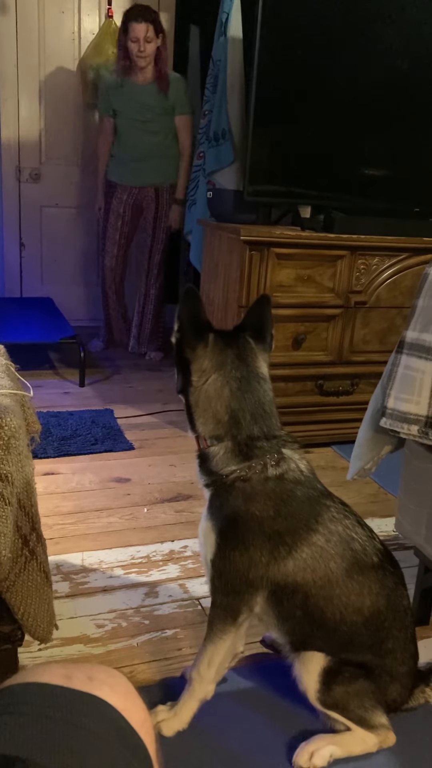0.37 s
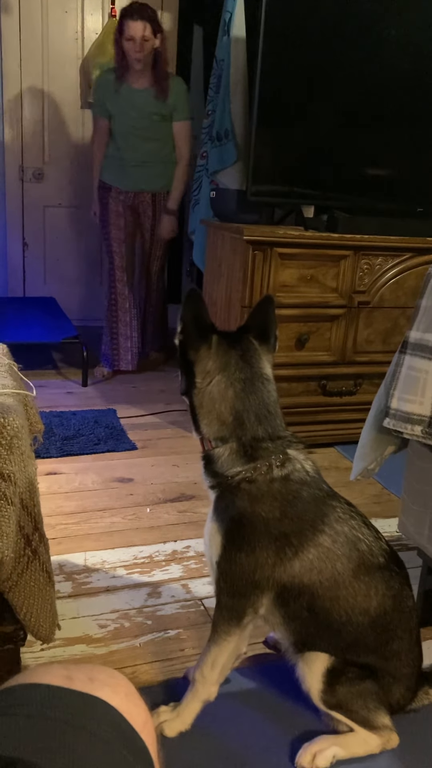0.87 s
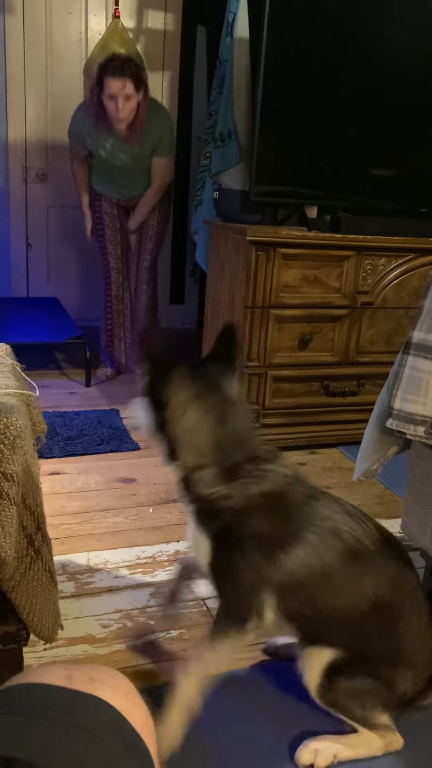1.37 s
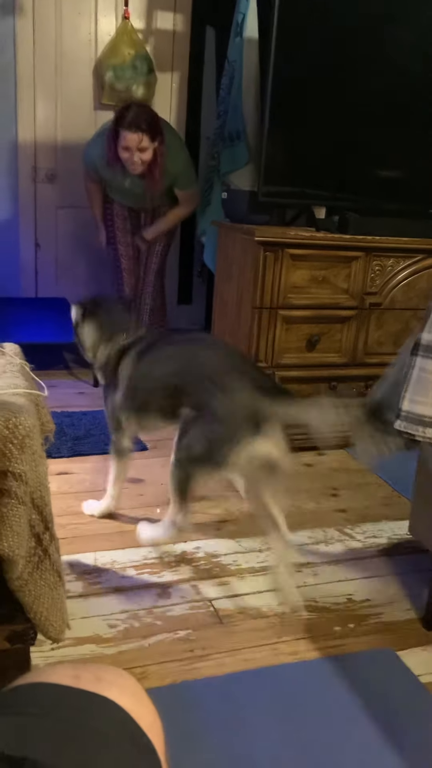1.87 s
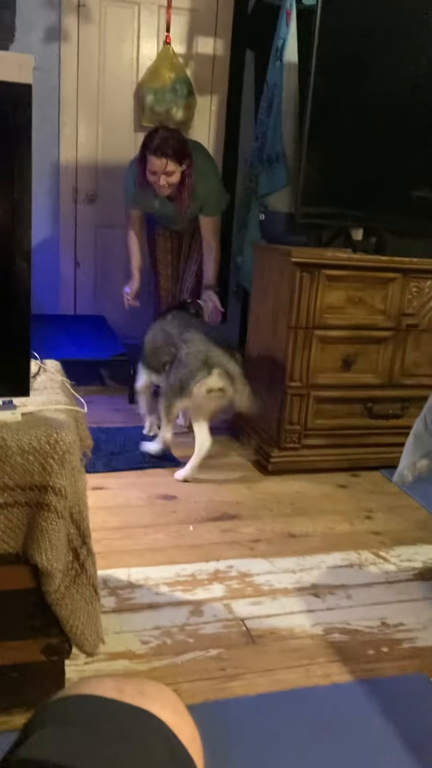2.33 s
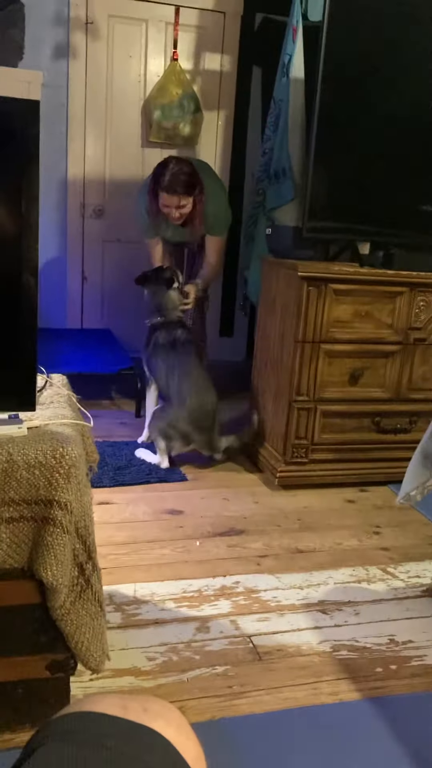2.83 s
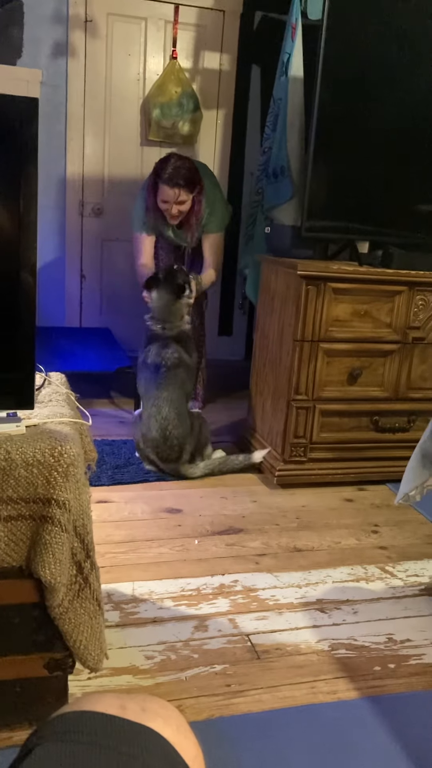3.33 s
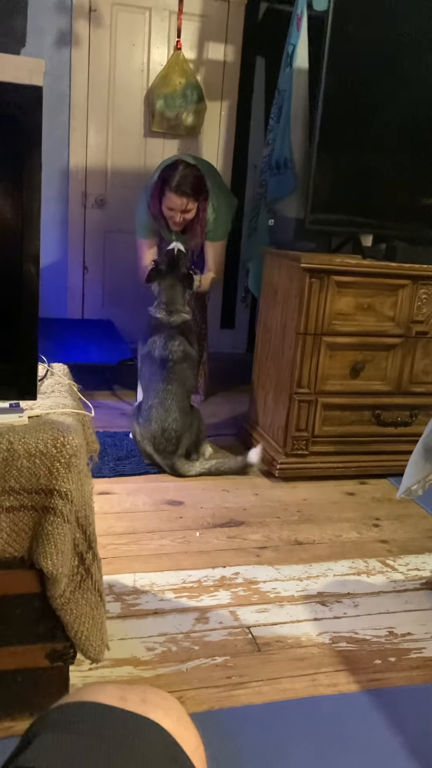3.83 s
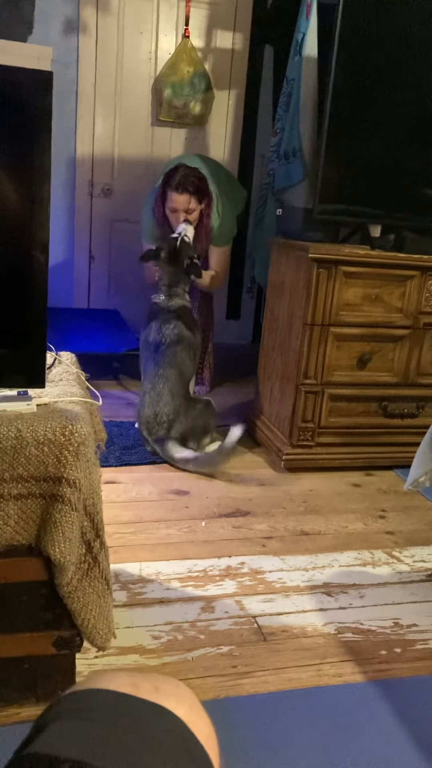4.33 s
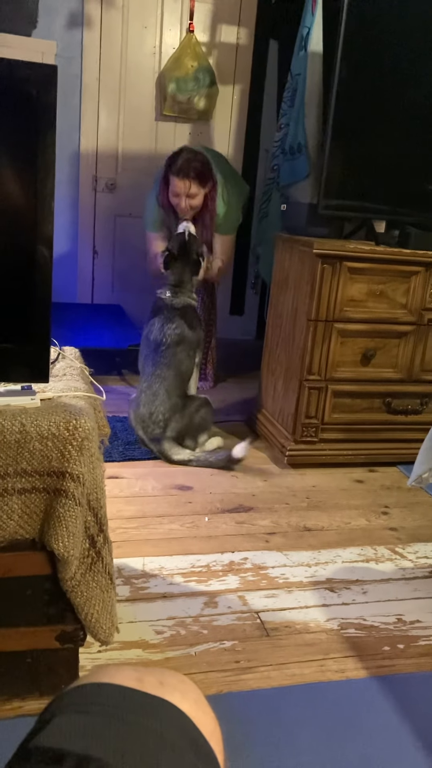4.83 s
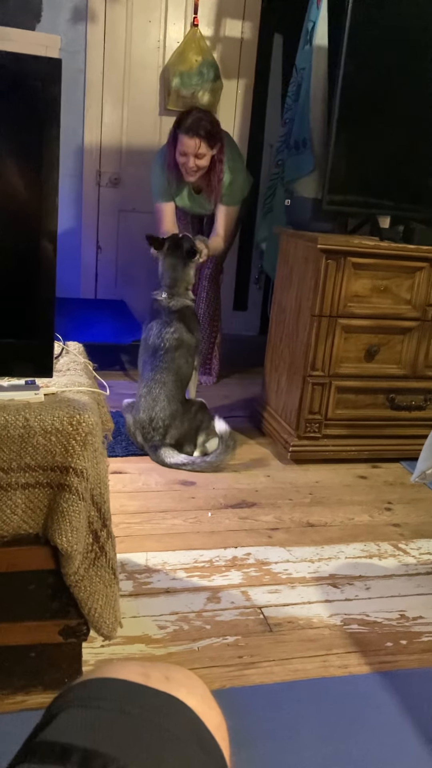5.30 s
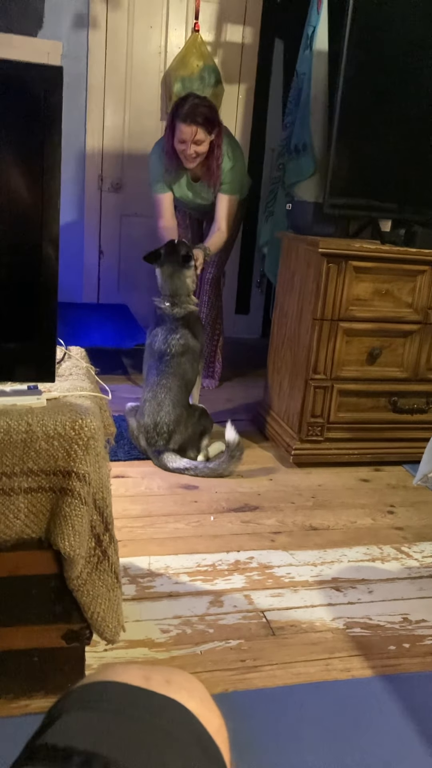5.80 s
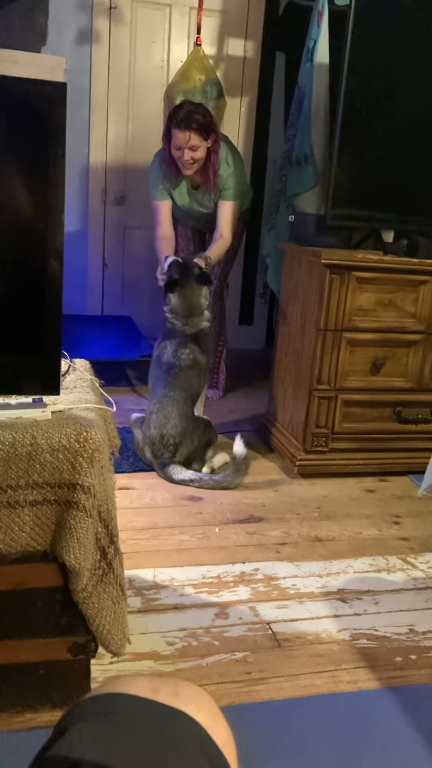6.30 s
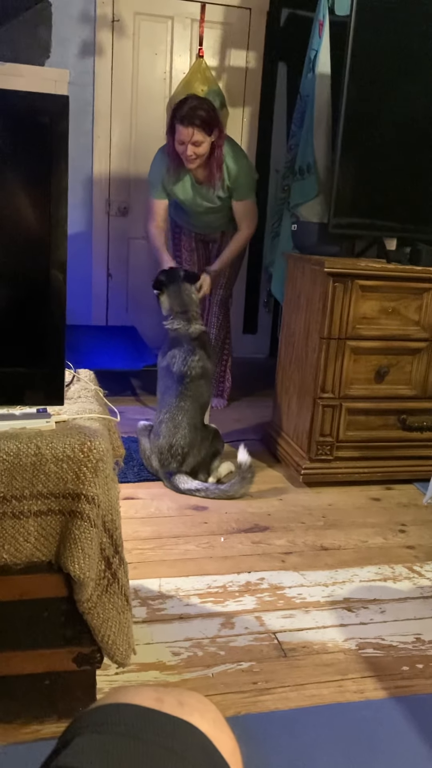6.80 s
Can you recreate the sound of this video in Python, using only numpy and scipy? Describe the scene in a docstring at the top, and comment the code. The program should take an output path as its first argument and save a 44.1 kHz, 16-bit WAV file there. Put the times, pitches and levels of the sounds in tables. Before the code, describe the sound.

One long mid-pitched husky howl slides downward, clear at first, then trembling and coarse, ending in a rasp with a quick pitch drop. Quick faint claw ticks and muffled paw landings overlap and follow its end, then scattered small knocks and a brief scuff on bare boards. Underneath, a quiet fan-like blower hums and rushes, gradually louder. Heard by a nearby two-port phone microphone in a furnished room with a short echo.

```python
"""From the start a blower, filtered noise and a wavering hum, grows louder under a husky's falling howl.
The young dog is near two microphone ports in a small wooden room; modulated folds drive its throat.
The note starts clean, flutters from 0.3 s, locks to three cycles at 1.1 s, rasps, growls, rasps and drops.
From 1 s paws scuff (shaped noise); from 1.5 s claws tick (snaps, board modes), and soft pads thud (low
sine pulses). The last claw falls at 5.4 s, and the blower is left alone."""
import sys
import numpy as np
from scipy import signal
from scipy.fft import rfft, irfft
from scipy.io import wavfile
from scipy.ndimage import uniform_filter1d

SR = 44100
rng = np.random.default_rng(int(sys.argv[2]) if len(sys.argv) > 2 else 0)


def wav_out(sig):
    """Save sig, one row per channel (or a flat mono array), as 16-bit PCM at SR to the path in sys.argv[1]."""
    wavfile.write(sys.argv[1], SR, np.round(np.clip(np.atleast_2d(sig).T, -1, 1) * 32767).astype(np.int16))


def ratio_of_db(decibels):
    """Turn decibels (scalar or array-like) into linear amplitude factors; 0 dB maps to 1."""
    return 10 ** (np.asarray(decibels, float) / 20)


N = 305018
T = np.arange(N) / SR  # time [s]
HZ = np.fft.rfftfreq(N, 1 / SR) + 1e-3  # frequency [Hz], kept off zero

# falling note that drives the throat: (time [s], pitch [Hz], relative level [dB])
HOWL_NOTE = [(0.0, 523.5, -23.5), (0.126, 493.4, -25), (0.29, 491.1, -25), (0.328, 452.8, -23.5),
             (0.8, 441.9, -26.5), (1.058, 433, -28), (1.068, 428.6, -32.5), (1.11, 433.5, -27),
             (1.12, 421.3, -22.5), (1.36, 399.4, -24.5), (1.5, 387.7, -26), (1.6, 398.4, -24.5),
             (1.772, 366.9, -25.5), (1.82, 391.7, -30), (1.85, 310, -32), (1.88, 220, -31),
             (1.915, 200, -46)]
# the note passes from register to register:
# (start [s], register [name], roughness at its start [0-1], roughness at its end [0-1])
REGISTER_SECTIONS = [(0, "clean", 0, .02), (.305, "flutter", 0.5, 0.86), (1.11, "locked", .18, 0.12),
                     (1.36, "rasp", 0.5, 0.52), (1.57, "growl", .33, 0.69), (1.795, "rasp", 0.5, 0.53)]
# how the folds swing in each register, by name: upper, lower, second = shares of the partner tones one
# flutter above, one below and two above the note [ratio]; slap_db, overtones_db = relative levels [dB]
FOLD_REGISTERS = { "clean": dict(upper=0.055, lower=.01, second=.01, slap_db=-60.5, overtones_db=9.5),
                  "flutter": dict(upper=0.77, lower=.03, second=0.019, slap_db=-41.5, overtones_db=4.5),
                  "locked": dict(upper=0.26, lower=0.29, second=0.23, slap_db=-19, overtones_db=-13.5),
                  "growl": dict(upper=0.26, lower=0.19, second=0.19, slap_db=-24, overtones_db=-4.5),
                  "rasp": dict(upper=-.08, lower=0.2, second=0.049, slap_db=-18, overtones_db=3.5), }
# throat and mouth resonances: (frequency [Hz], width of one stage [Hz], gain [dB])
THROAT_RESONANCES = [(486, 318, 2), (667, 140, -4), (751, 54.5, 5), (1049, 120, -5.5), (1449, 120, 4.5),
                     (2820, 1100, -38), (5770, 560, -10), (8240, 500, -6.5), (9400, 1500, -8.5)]
# muzzle movement: (time [s], closing [0-1])
MUZZLE_CLOSING = [(.45, 0), (1.1, 0.7), (1.12, 0), (1.35, .35), (1.39, .95)]
# claw blows on boards: (time [s], relative level [dB], sharp tick [0-1], top part [dB])
CLAW_BLOWS = [(1.508, -53.5, 0.7, -21), (1.528, -42.5, 0.6, -30.5), (1.576, -47, 0.95, -19.5),
              (1.5955, -36, 0.9, -33.5), (1.648, -48.5, 0.9, -25.5), (1.8525, -33, 0.7, -20.5),
              (1.929, -51.5, 0.95, -19.5), (1.9725, -46.5, 0.05, -29), (2.138, -50, 0.4, -23),
              (2.3084, -56, 0.45, -18), (2.6535, -42.5, 0.57, -33.5), (3.2245, -30.5, 0.14, -34),
              (3.37, -53.5, 0.05, -33), (3.5414, -38.5, 0.22, -27), (3.7314, -48, 0, -39),
              (3.808, -54, 0.3, -35), (3.8658, -52.5, 0.45, -21.5), (4.0685, -60, 1, -34),
              (4.17, -50, 0.2, -46), (4.368, -55.5, 0.3, -32), (4.559, -29.5, 0.4, -31),
              (4.9194, -51.5, 0.3, -35), (5.447, -38.5, 0.36, -27)]
# floorboard modes: (frequency [Hz], relative level under a blunt blow [dB])
BOARD_MODES = [(1810, -7.5), (4540, -14)]
# paw and fur scuffs: (start [s], swell [s], first level [dB], peak level [dB], top part at start [dB])
SCUFF_EVENTS = [(1.02, 0.068, -52.5, -53.5, 0), (1.286, 0.13, -67.5, -53.5, 2.5),
                (1.601, 0.033, -69, -61, -16), (1.738, 0.0063, -68, -67, -13.5),
                (4.486, 0.058, -54.5, -40.5, -7.5)]
# colour that boards and microphone give a scrape: (frequency [Hz], level [dB])
SCRAPE_COLOUR = [(530, -34.5), (900, -3.5), (1370, 7.5), (1510, 7), (1870, 2), (2080, 4.5), (3050, -2.5),
                 (4220, -0.5), (5900, -18), (7860, -7.5), (11400, -18), (11800, -47), (12800, -15),
                 (14500, -14.5), (15700, -19)]
# paw landings: (time [s], relative level [dB], tone [Hz])
PAW_LANDINGS = [(1.945, -35, 71), (1.973, -30.5, 262), (2.039, -36, 256), (2.321, -31, 135),
                (4.924, -32.5, 298)]
# blower rush: (time [s], mean level [dB])
BLOWER_LEVEL = [(0.0, -61.5), (0.3, -56.5), (2.1, -56), (4.3, -54.5), (5.35, -50), (6.92, -49)]
# colour of the air rush: (frequency [Hz], relative level [dB])
RUSH_COLOUR = [(18, -43), (30, -14), (49, -3), (70, -4), (91, -9), (226, -4), (263, -7), (294, -5),
               (448, -21.5), (524, -14), (612, -16), (1360, -25), (2420, -29.5), (2890, -30), (6000, -39.5),
               (7800, -72), (13200, -120)]
# duct resonances: (frequency [Hz], width [Hz], gain [dB])
DUCT_RESONANCES = [(303, 91, 6.5), (450, 150, 7), (1074, 60, 2), (1292, 97, 8.5), (1976, 48, 8),
                   (2793, 17, 12.5)]
# colour of the thin hiss: (frequency [Hz], relative level [dB])
HISS_COLOUR = [(2350, -36), (4000, -19), (5480, -19), (6740, -6), (8820, -5.5), (10400, -14.5),
               (10800, -46), (12200, -30.5), (14600, -18), (15700, -29.5)]
# port differences for room sound, then for the dog:
# (frequency [Hz], left minus right [dB], left lead beyond the lag [rad], likeness [0-1])
ROOM_PORTS = [(60, 1.6, 0, .99), (200, 1, -.2, .99), (310, 3.8, -.5, .93), (400, 0, -.6, .87),
              (500, 5, -1.8, .55), (650, -3, -2, .6), (1250, -3.4, -.4, .55), (2000, -.8, 0, .65),
              (3000, -1, 1.3, .6), (3900, -1, -1, .4), (6000, 1, -.3, .7), (7700, 0, .2, .94),
              (9600, 0, 1, .9), (15000, 0, 1.6, .95)]
DOG_PORTS = [(200, 2, -.1, 1), (300, 4.5, .1, 1), (400, 9.5, .7, 1), (450, 12, .6, 1), (500, 12, .1, 1),
             (600, 12, .4, 1), (770, 13, -.4, 1), (1000, 15, -1.6, 1), (1200, 7, -1.2, 1),
             (1400, 6, -1.5, 1), (1520, 4, -1, 1), (2000, -1, -.6, 1), (5500, -9, -.1, 1),
             (9600, -.5, .7, 1)]

PORT_LAG_S = .000113  # the right port hears this much later, before the table's phase
OVERTONE_DB, OVERTONE_SLOPE_DB = -17.5, -11  # second harmonic [dB], fall [dB per octave]
CLOSED_SCALE = 0.9506  # resonance frequencies with the muzzle closed, as a ratio
SWITCH_S = 0.0027  # glide from register to register
PARTNER_HZ = 507  # outside rasp and lock a second swing stays near this pitch while the note sinks
RASP_HZ = 53.2  # mean flutter rate in the rasp
SCUFF_FADE_DB_PER_S, SCUFF_LINGER_DB, SCUFF_LINGER_DB_PER_S = 331, -32, 56.5
# over a scuff's swell the low part grows and the top part thins
LOW_FIRST_DB, LOW_PEAK_DB, LOW_LATE_DB, TOP_LOSS_DB = -16.5, -6, -1, -4.5
CLAW_TAIL_T60_S = .19  # of a blunt blow; sharp ticks decay sooner
SNAP_DB = 3  # snap over the blow, for a fully sharp tick
SHARP_RING_DB = -12  # board ring under a fully sharp tick, against a blunt blow
HUM_DB, HUM_HZ = 3, 58.2  # mean level over the rush, mean pitch
HISS_DB = -78
ROOM_T60_S, ROOM_DB = .25, -19  # decay time, tail energy against the direct sound


def curves(rows):
    """Linear interpolation turns each column of a time table into a signal."""
    s, *columns = np.transpose(rows)
    return [np.interp(T, s, column) for column in columns]


def along(rows, column=1):
    """Interpolation on a logarithmic frequency axis gives a spectral curve."""
    rows = np.array(rows)
    return np.interp(np.log(HZ), np.log(rows[:, 0]), rows[:, column])


def unit(x):
    """Normalisation by root mean square gives unit power."""
    return x / np.sqrt(np.mean(x ** 2))


def band_unit(x, lo_hz, hi_hz):
    """Band normalisation gives one band of the two ports' mean an rms of 1."""
    inside = (HZ > lo_hz) & (HZ < hi_hz)
    return x / np.std(irfft(rfft(x.mean(axis=0)) * inside, N))


def resonance(hz, width):
    """A damped second-order resonator passes a band, with gain 1 at its centre."""
    return 1j * HZ * width / (hz ** 2 - HZ ** 2 + 1j * HZ * width)


def walk(rate):
    """Twice-averaged white noise wanders smoothly, turning about rate times a second, with rms 1."""
    k = max(int(SR / rate), 1)
    return unit(uniform_filter1d(uniform_filter1d(rng.standard_normal(N), k), k))


def ports(direct, other, table):
    """Interaural-style level, phase and coherence: a sound and an unrelated twin form left and right."""
    half = ratio_of_db(along(table, column=1) / 2)
    lead = along(table, column=2) + 2 * np.pi * HZ * PORT_LAG_S
    like = np.clip(along(table, column=3), 0, 1)
    shared = np.sqrt((1 + like) / 2) * rfft(direct)
    opposed = np.sqrt((1 - like) / 2) * rfft(other)
    left = (shared + opposed) * half * np.exp(.5j * lead)
    right = (shared - opposed) / half * np.exp(-.5j * lead)
    # keeps the level of the middle roughly even; the small term avoids division by zero
    mid = np.sqrt(half ** 2 + half ** -2 + 2 * like * np.cos(lead) + 0.064) / 2
    return irfft(np.array([left, right]) / mid, N)


def noise_pair(rows):
    """A diffuse field: coloured noise reaches the two ports only partly alike."""
    a, b = irfft(rfft(rng.standard_normal((2, N))) * ratio_of_db(along(rows)), N)
    return ports(a, b, ROOM_PORTS)


def howl():
    """Source and filter: modulated vocal folds, slaps and breath excite the resonant throat."""
    pitch, level_db = curves(HOWL_NOTE)
    folds, rough, register = registers()
    upper, lower, second, slap_db, overtones_db = folds.values()
    flutter_hz = np.where(register == "rasp", RASP_HZ, PARTNER_HZ - pitch)
    swing = 2 * np.pi * np.cumsum(pitch * (1 + .025 * rough * walk(150))) / SR
    free = 2 * np.pi * np.cumsum(flutter_hz * (1 + 0.22 * rough * walk(60))) / SR
    # locked: one flutter lasts exactly three cycles
    flutter = np.where(np.isin(register, ("locked", "growl")), swing / 3, free)
    upper = upper * ratio_of_db(1.5 * rough * walk(40))  # the partner comes and goes
    # the partners beat with the note: its size and timing swing once a flutter
    beat = 1 + upper * np.exp(1j * flutter) + lower * np.exp(-1j * flutter)
    beat = beat + second * np.exp(2j * flutter)
    beat = beat / np.sqrt(1 + upper ** 2 + lower ** 2 + second ** 2)
    cycle = swing + np.angle(beat)
    size = 1.3 * np.tanh(np.abs(beat)) + .15 * rough * walk(250)  # the swing saturates
    scatter = (.035 + .5 * rough) * walk(300)  # the closing moment wanders, which blurs the overtones
    overtones = 0
    for k in range(2, 23):
        overtone_db = OVERTONE_DB + OVERTONE_SLOPE_DB * np.log2(k / 2)
        overtones = overtones + ratio_of_db(overtone_db) * np.cos(k * (cycle + scatter))
    # the folds slap shut sharply only on the cycles at the crest of the flutter
    slap = np.exp(14 * (np.cos(cycle) - 1)) * np.exp(6.4 * (np.cos(flutter) - 1))
    slap = slap * ratio_of_db(5 * rough * walk(150))
    turbulence = 1.27 * walk(700) + ratio_of_db(-27.5) * rng.standard_normal(N)
    breath = rough * turbulence * (1 + np.cos(cycle))
    # slap and breath fill the spectrum around the note and leave the note itself steady
    around_note = 1 - .92 * np.abs(resonance(420, 240))
    rasp = irfft(rfft(ratio_of_db(slap_db) * unit(slap) + breath) * around_note, N)
    flow = (np.cos(cycle) + ratio_of_db(overtones_db) * overtones) * size + rasp
    flow = flow * ratio_of_db(level_db) * np.clip((HOWL_NOTE[-1][0] - T) / 0.03, 0, 1)
    # a closing muzzle lowers all resonances: crossfade from the open to the closed throat
    opened, closed = (irfft(rfft(flow) * throat(scale), N) for scale in (1, CLOSED_SCALE))
    closing = np.clip(curves(MUZZLE_CLOSING)[0], 0, 1)
    return np.sqrt(2) * ((1 - closing) * opened + closing * closed)


def registers():
    """Register transition: fold settings and roughness glide at a switch, the register's name jumps."""
    starts = [row[0] for row in REGISTER_SECTIONS] + [HOWL_NOTE[-1][0]]
    now = np.clip(np.searchsorted(starts, T, side="right") - 1, 0, len(REGISTER_SECTIONS) - 1)
    done = np.clip((T - np.take(starts, now)) / np.diff(starts)[now], 0, 1)
    names = [row[1] for row in REGISTER_SECTIONS]

    def glide(values):
        """A moving average spreads a step over the switch time."""
        return uniform_filter1d(np.asarray(values, float), max(int(SWITCH_S * SR), 1))

    folds = {}
    for key in FOLD_REGISTERS["clean"]:
        settings = np.array([FOLD_REGISTERS[name][key] for name in names])
        folds[key] = glide(settings[now])
    first, last = np.array([row[2:] for row in REGISTER_SECTIONS])[now].T
    rough = np.clip(glide(first + (last - first) * done), 0, 1)
    return folds, rough, np.array(names)[now]


def throat(scale):
    """Formants: parallel squared resonators, all centre frequencies shifted by one factor."""
    return sum(ratio_of_db(db) * resonance(scale * hz, width) ** 2 for hz, width, db in THROAT_RESONANCES)


def claws():
    """Impact excitation: a snap, a tick, ringing board modes and a scattered tail; blunt blows rise slower."""
    low, high, top = scrape_noise()
    tone, snap, shape, top_shape = np.zeros((4, N))
    for s, db, tick, top_db in CLAW_BLOWS:
        t = np.maximum(T - s, 0)
        on = ratio_of_db(db) * (T >= s)
        sharp = tick * np.exp(-t / 0.003) * (1 - np.exp(-t / 0.00076))
        tail_t60_s = CLAW_TAIL_T60_S * (1 - 0.27 * tick)
        tail = 0.26 * np.exp(-np.log(1000) * t / tail_t60_s) * (1 - np.exp(-t / 0.0072))
        blow = on * (sharp + tail)
        shape += blow
        top_shape += ratio_of_db(top_db) * blow
        snap[int(s * SR)] = ratio_of_db(db + SNAP_DB) * tick ** 2
        ring = 0
        for hz, mode_db in BOARD_MODES:
            ring = ring + ratio_of_db(mode_db + SHARP_RING_DB * tick) * np.sin(2 * np.pi * hz * t)
        tone += on * np.exp(-t / .003) * ring
    colour = ratio_of_db(along(SCRAPE_COLOUR))
    snap = irfft(rfft(snap) * colour / colour.mean(), N)
    noise = 0.7 * (shape * (high + 0.88 * low) + 4 * top_shape * top)
    return noise + ports(tone + snap, 0 * tone, ROOM_PORTS) + room(tone) * ratio_of_db(28.0)


def scuffs():
    """Sliding friction of pads and fur: grainy noise starts within 5 ms, swells, fades and lingers."""
    low, high, top = scrape_noise()
    out = 0
    for s, swell, first_db, peak_db, top_db in SCUFF_EVENTS:
        rise = np.clip((T - s) / swell, 0, 1)
        after = np.maximum(T - s - swell, 0)
        fade = ratio_of_db(-SCUFF_FADE_DB_PER_S * after)
        fade = fade + ratio_of_db(SCUFF_LINGER_DB - SCUFF_LINGER_DB_PER_S * after)
        size = np.clip((T - s) / .0048, 0, 1) * ratio_of_db(first_db + (peak_db - first_db) * rise) * fade
        # a pad slows as it slides, so its spectrum sinks
        low_db = np.interp(T - s, [0, swell, swell + 0.017], [LOW_FIRST_DB, LOW_PEAK_DB, LOW_LATE_DB])
        out = out + size * (high + ratio_of_db(low_db) * low + ratio_of_db(top_db + TOP_LOSS_DB * rise) * top)
    return out * ratio_of_db(1.3 * walk(200) + 1.8 * walk(45))


def scrape_noise():
    """Band splitting: board-coloured noise in a low, a high and a top part, each normalised."""
    low = 1 / (1 + (HZ / 5600) ** 8)
    top = 1 / (1 + (11700 / HZ) ** 40)
    spectrum = rfft(noise_pair(SCRAPE_COLOUR))
    parts = (low, 1700, 5000), ((1 - low) * (1 - top), 6500, 11000), (top, 12300, 15800)
    return [band_unit(irfft(spectrum * share, N), lo, hi) for share, lo, hi in parts]


def thuds():
    """Damped oscillation: soft pads push the floor for a few low cycles."""
    out = np.zeros(N)
    for s, db, hz in PAW_LANDINGS:
        t = np.maximum(T - s, 0)
        out += ratio_of_db(db) * (t / 0.0067) * np.exp(1 - t / 0.0043) * np.sin(2 * np.pi * hz * t)
    return ports(out, 0 * out, ROOM_PORTS)


def blower():
    """Motor tone and turbulence: a wavering hum, air noise in resonant ducts and a steady thin hiss."""
    rush_db, = curves(BLOWER_LEVEL)
    hum = np.sqrt(2) * np.sin(2 * np.pi * np.cumsum(HUM_HZ + 2.4 * walk(9)) / SR)
    hum = hum * ratio_of_db(rush_db + HUM_DB + 1.4 * walk(2.3))
    ducts = 1
    for hz, width, db in DUCT_RESONANCES:
        ducts = ducts * (1 + (ratio_of_db(db) - 1) * np.abs(resonance(hz, width)))
    rush = band_unit(irfft(rfft(noise_pair(RUSH_COLOUR)) * ducts, N), 90, 210)
    rush = rush * ratio_of_db(rush_db + .9 * walk(8))
    hiss = ratio_of_db(HISS_DB) * band_unit(noise_pair(HISS_COLOUR), 7100, 9600)
    return ports(hum, 0 * hum, ROOM_PORTS) + rush + hiss


def room(x):
    """Reverberation: exponentially decaying noise, different at each port, as a short furnished-room tail."""
    t = np.arange(int(ROOM_T60_S * SR)) / SR
    decay = np.exp(-np.log(1000) * t / ROOM_T60_S) * (t > .004)
    tail = rng.standard_normal((2, len(t))) * decay
    tail = tail / np.sqrt(np.sum(tail[0] ** 2))
    return ratio_of_db(ROOM_DB) * signal.fftconvolve(x[None], tail)[:, :N]


def scene():
    """Superposition: dog, paws and blower add at the two ports."""
    voice = howl()
    dog = ports(voice, 0 * voice, DOG_PORTS) + room(voice)
    return dog + scuffs() + claws() + thuds() + blower()


def roll_off(x):
    """The treble ends steeply here."""
    return signal.sosfilt(signal.butter(12, 15890, fs=SR, output="sos"), x)


def record(dry):
    """Band limitation: the phone cuts everything above 15880 Hz."""
    cut = irfft(rfft(dry) * (HZ < 15880), N)
    return roll_off(cut)


dry = scene()
out = record(dry)
wav_out(out)
```